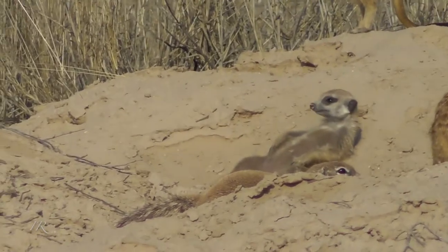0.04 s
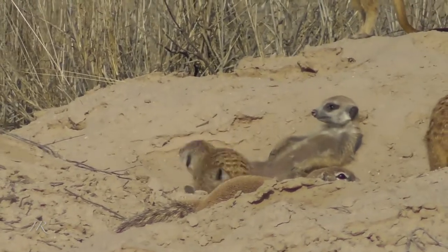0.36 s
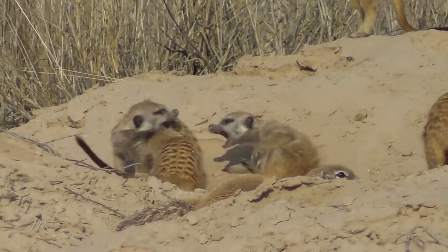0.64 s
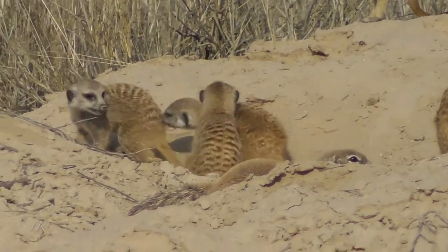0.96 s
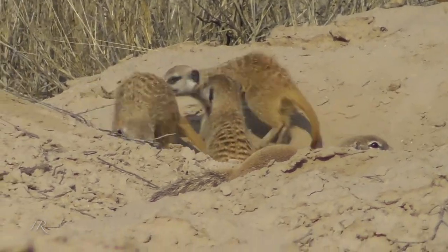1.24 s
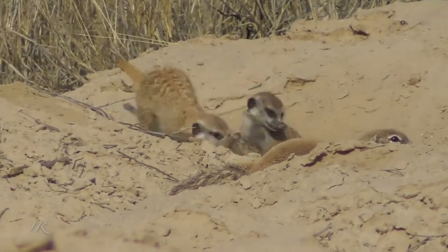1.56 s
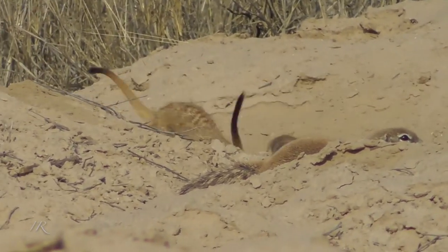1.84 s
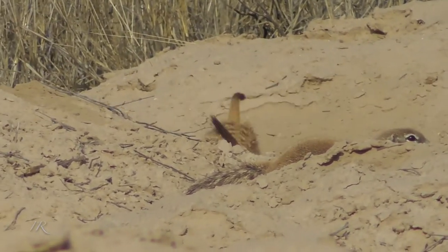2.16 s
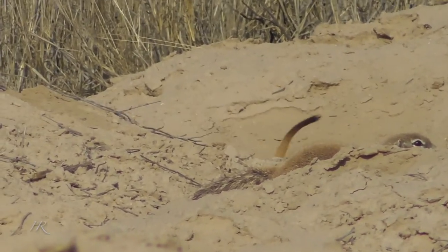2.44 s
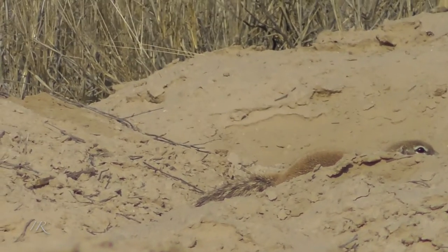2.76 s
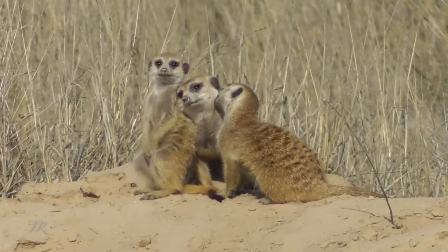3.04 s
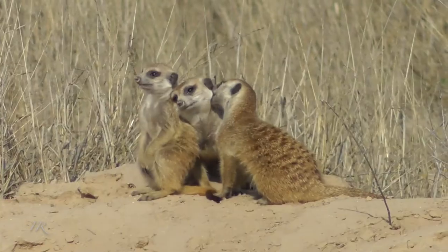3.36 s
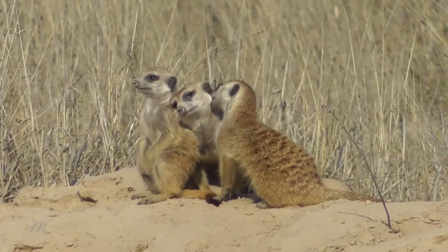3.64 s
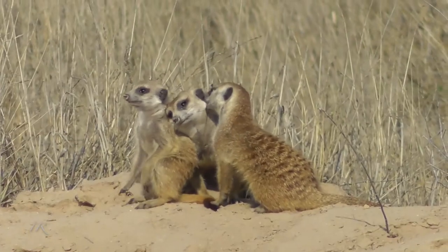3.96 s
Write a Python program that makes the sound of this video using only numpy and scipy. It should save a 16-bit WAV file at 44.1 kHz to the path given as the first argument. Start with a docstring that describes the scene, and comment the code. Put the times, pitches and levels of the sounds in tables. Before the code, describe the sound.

A quick run of thin, bird-like chirps and soft pips sounds slightly left of the microphone in dry, open country. After a short gap the chirping returns, joined late by raspier notes, over soft wind rumble and hiss.

```python
"""Dry open grassland by a meerkat burrow, with quick high chirps that suggest a small bird.
Each note is a fast whistled sweep. A few keep coming back: a sharp chip, a rising slur, two soft pips
and, late on, a two-voiced zigzag. Sand and grass scatter them briefly,
over low wind, steady hiss and a few soft knocks."""
import sys
import numpy as np
from scipy import signal
from scipy.fft import rfft, irfft
from scipy.io import wavfile

SR = 44100
rng = np.random.default_rng(int(sys.argv[2]) if len(sys.argv) > 2 else 0)


def inscribe(sig):
    """Save sig as 16-bit PCM at rate SR to the path in sys.argv[1].

    A 1-D sig is mono; a 2-D sig holds one channel per row.
    Samples are clipped to [-1, 1] before scaling.
    """
    pcm = np.round(np.clip(np.atleast_2d(sig).T, -1, 1) * 32767)
    wavfile.write(sys.argv[1], SR, pcm.astype(np.int16))


N = 176400
PURE, RASPY, BREATHY = .0049, .034, .067  # random waver, as a share of the pitch


def gain(db):
    """Turn decibels into a multiplier."""
    return 10 ** (np.asarray(db) / 20)


def wander(rate_hz, size):
    """A smooth random drift, about 1 either way."""
    steps = np.arange(size) * rate_hz / SR
    count = int(steps[-1]) + 2
    return 1.15 * np.interp(steps, np.arange(count), rng.standard_normal(count))


def tone_curve(points):
    """Join (pitch_hz, level_db) points into a gain for every frequency."""
    hz, db = np.array(points).T
    all_hz = np.arange(N // 2 + 1) * SR / N
    return gain(np.interp(np.log(all_hz + 1), np.log(hz), db))


def air_noise(tone):
    """Stereo noise, wide in the bass and top treble, narrow in between."""
    # stereo width, side against middle: pitch_hz, level_db
    widths = [(30, 7.5), (100, 10), (330, 10), (700, 6), (1290, 1), (1900, -7), (2700, -33), (6500, -36),
              (7800, -27), (8700, -9), (11000, -4.5), (15000, -1)]
    width = tone_curve(widths)
    mid, side = rfft(rng.standard_normal((2, N)))
    spectra = np.array([mid + width * side, mid - width * side])
    pair = irfft(spectra * tone_curve(tone) / np.hypot(1, width), N)
    return pair / pair.std()


def wind_and_hiss():
    """Low wind, high hiss and a rustle; the whole background noise dips and comes back."""
    # tone of each noise: pitch_hz, level_db
    wind_tone = [(20, 2), (50, 1.5), (110, 2), (200, 2.5), (400, -1.5), (700, -5.5), (950, -8.5),
                 (1200, -21.5), (1550, -36.5), (2000, -34.5), (3000, -56)]
    hiss_tone = [(1400, -44), (2000, -12.5), (2400, -26.5), (3000, -7.5), (4000, -19), (5100, -15),
                 (6500, -4.5), (8400, 1), (11000, 1), (15500, 1)]
    rustle_tone = [(1500, -27), (2450, -10), (2900, -3.5), (4200, 4.5), (5200, -5), (6200, 3.5), (8000, 0),
                   (10000, -1.5), (15000, -16)]
    # how the noises dip and come back: time_s, level_db
    background_levels = [(0, 0), (.6, 2), (1.3, 1.5), (1.5, -1.5), (1.95, -1), (2.1, 1.5), (2.8, 3),
                         (2.86, -1), (3.1, 0.5), (3.5, 2), (3.8, 4), (4, 2.5)]
    rustle_levels = [(0, -4), (.5, -6), (1.3, -6.5), (1.48, -15), (2.0, -11), (2.08, -6.5), (2.81, -1.5),
                     (2.85, -8), (3.1, -4.5), (3.5, -2), (4, 1.5)]
    t = np.arange(N) / SR
    background_db = np.interp(t, *np.array(background_levels).T)
    rustle_db = np.interp(t, *np.array(rustle_levels).T)
    wind = air_noise(wind_tone) * gain(-56.5 + 1.18 * wander(7.1, N))
    rustle = air_noise(rustle_tone) * gain(-67 + rustle_db + 2 * wander(30, N))
    hiss = air_noise(hiss_tone) * gain(-61.5)
    return (wind + hiss) * gain(background_db) + rustle


def note(shape, waver, flutter_db=.8, octave_db=-27):
    """One wavering, whistled sweep with a faint copy an octave up."""
    ms, hz, db = np.array(shape).T
    ms = np.sort(ms)
    t_ms = np.arange(ms[0], ms[-1], 1000 / SR)
    wobble, flutter = (wander(1300, len(t_ms)) for _ in range(2))
    off_tune = .011 * rng.standard_normal()
    pitch_hz = np.interp(t_ms, ms, hz) * (1 + off_tune + waver * wobble)
    phase = 2 * np.pi * np.cumsum(pitch_hz) / SR
    fade = np.clip(2 * np.minimum(t_ms - t_ms[0], t_ms[-1] - t_ms), 0, 1)
    loudness = fade * gain(np.interp(t_ms, ms, db) + flutter_db * flutter)
    return loudness * (np.sin(phase) + gain(octave_db) * np.sin(2 * phase))


def sing(calls, shapes, waver):
    """Play the shapes at every call; a shape's offset_ms counts from the call's time_s."""
    out = np.zeros(N)
    for time_s, level_db in calls:
        for shape in shapes:
            sound = gain(level_db - .2) * note(shape, waver)
            offset_ms = min(point[0] for point in shape)
            start = round((time_s + offset_ms / 1000) * SR)
            first, last = max(start, 0), min(start + len(sound), N)
            if last > first:
                out[first:last] += sound[first - start:last - start]
    return out


def whistles():
    """Faint, longer whistles that slide down."""
    # the slide: offset_ms, pitch_hz, level_db
    shape = [(-45, 4500, -12), (-20, 3700, -1), (0, 3250, 0), (25, 2900, -3), (45, 2700, -10)]
    # calls: time_s, level_db
    calls = [(.017, -60.5), (.457, -61.5)]
    return sing(calls, [shape], PURE)


def chips():
    """A sharp, pure chip between a raspy two-voiced flick and a low blip."""
    # the four sweeps: offset_ms, pitch_hz, level_db
    flick = [(-9.5, 8300, -27), (-8, 7500, -16), (-6.6, 5600, -15), (-5.6, 3900, -21), (-4.6, 2900, -32)]
    upper_flick = [(-12.5, 8350, -28), (-7, 6900, -10), (-3, 5480, -22), (-3.5, 4900, -30)]
    chip = [(-2.7, 5500, -26), (-1.7, 6150, -3.5), (-.2, 6870, 1), (1.3, 6900, -4), (2.4, 7000, -13),
            (3.4, 6900, -30)]
    blip = [(5.8, 3740, -34), (7.5, 4130, -10), (9.5, 4000, -17), (11.3, 3520, -25), (13, 1970, -22.5)]
    # calls: time_s, level_db
    calls = [(.068, -32), (.2221, -32), (.3693, -30.5), (.5233, -31), (.7558, -33.5), (.8999, -32.5),
             (1.0517, -32.5), (1.2663, -31.5), (2.0585, -33), (2.1937, -31), (2.3386, -32.5), (2.4872, -32),
             (2.9029, -32.5), (3.0619, -32.5), (3.2194, -31.5), (3.4497, -31.5), (3.6848, -32),
             (3.8469, -30.5), (3.9979, -30.5)]
    return sing(calls, [chip], PURE) + sing(calls, [flick, upper_flick, blip], RASPY)


def slurs():
    """A smooth upward slide just after a chip."""
    # the slide: offset_ms, pitch_hz, level_db
    shape = [(-9.7, 2650, -23), (-6, 3350, -10), (-1, 3980, -1.5), (3.5, 4330, .5), (7, 4600, -3),
             (9.5, 4650, -6), (12, 4450, -20)]
    # calls: time_s, level_db
    calls = [(.0995, -41.5), (.2531, -41.5), (.4013, -42.5), (.5554, -40.5), (.7865, -42), (.9315, -40.5),
             (1.0838, -40), (1.2975, -41), (2.0885, -43), (2.2249, -40.5), (2.3702, -40.5), (2.5195, -39),
             (2.9342, -41.5), (3.0925, -41), (3.2506, -41.5), (3.4808, -42), (3.7165, -42), (3.8785, -42.5)]
    return sing(calls, [shape], PURE)


def ticks():
    """Raspy drops in pitch, so quick that they tick."""
    # the drop: offset_ms, pitch_hz, level_db
    shape = [(-2.5, 5900, -16), (-1, 4900, -3), (0, 4200, -2), (1.3, 3500, -5), (3, 2900, -16)]
    # calls: time_s, level_db
    calls = [(.6035, -53), (.952, -46), (1.1135, -47), (1.9255, -49.5), (2.0955, -54), (2.236, -51),
             (2.644, -57), (2.808, -51.5), (3.013, -58), (3.394, -48.5), (3.542, -48)]
    return sing(calls, [shape], RASPY)


def pips():
    """Soft low and high pips; two breathy voices lead into each high one."""
    # the pips and each lead-in voice: offset_ms, pitch_hz, level_db
    low = [(-9.2, 2700, -20), (-7.5, 3700, -5), (-5.5, 4300, -20), (-3.5, 4250, -10), (-1, 4020, 1),
           (2.5, 3950, -2), (5.5, 4100, -17)]
    high = [(-8, 4960, -33), (-6, 5300, -3), (-6, 3600, -10), (-2.5, 5000, -8), (0.2, 4950, 0.5),
            (3.5, 4880, -6.5), (6, 4600, -8.5)]
    lead_in = [
        [(-36.5, 5700, -39), (-17.5, 5950, -21), (-9.5, 5700, -19), (-9, 5300, -22)],
        [(-36.5, 5000, -26), (-20, 3900, -20.5), (-13, 4300, -13), (-6, 8100, -27)],
    ]
    # calls: time_s, level_db
    low_calls = [(.6213, -45), (.777, -42), (.9713, -42.5), (1.1324, -42), (1.2885, -43.5), (2.1145, -48),
                 (2.2537, -43.5), (2.517, -38.5), (2.6629, -42.5), (3.2739, -45), (3.4109, -44.5),
                 (3.5602, -40), (3.7175, -39), (3.868, -43.5)]
    high_calls = [(.6722, -40), (.8307, -43), (1.0272, -41), (1.1894, -40), (1.3455, -43), (2.1649, -43.5),
                  (2.3074, -43.5), (2.5688, -42.5), (2.7193, -43.5), (3.3242, -45), (3.4672, -45),
                  (3.6159, -43), (3.7725, -43), (3.9243, -49)]
    pure_notes = sing(low_calls, [low], PURE) + sing(high_calls, [high], PURE)
    return pure_notes + sing(high_calls, lead_in, BREATHY)


def wisps():
    """Faint, raspy notes that fall away."""
    # the fall: offset_ms, pitch_hz, level_db
    shape = [(-14, 4300, -7), (-3.5, 3900, -6.5), (3.5, 3450, -5.5), (16, 3000, -21)]
    # calls: time_s, level_db
    calls = [(1.407, -66), (1.445, -70), (1.542, -69), (1.795, -68.5), (2.028, -66), (2.398, -63),
             (3.505, -56), (3.755, -56)]
    return sing(calls, [shape], RASPY)


def warbles():
    """A low voice wiggles while a high one dips and climbs."""
    # each voice: offset_ms, pitch_hz, level_db
    voices = [
        [(-24.5, 3100, -8), (-8.5, 2600, -13), (1.5, 3200, -2), (7, 2900, -6), (14.5, 2800, -6)],
        [(-23.5, 7000, -6), (-8.5, 4650, -4), (4, 4150, -5), (12, 4900, 2.5), (20.5, 4900, -4), (33, 6600, -7)],
    ]
    # calls: time_s, level_db
    calls = [(2.443, -68), (2.604, -63), (2.764, -62.5), (3.655, -65)]
    return sing(calls, voices, PURE)


def zigzags():
    """Two raspy voices sweep up, then both sweep down."""
    # each sweep: offset_ms, pitch_hz, level_db
    sweeps = [
        [(-14, 4700, -22), (-8.5, 5850, -4), (-5.8, 6600, -11), (-3, 8000, -3), (-1.3, 9300, -18)],
        [(-10, 2700, -25), (-4, 3500, -14), (-2.3, 4800, -12), (-.7, 5750, 0), (1, 7300, -1), (2.6, 8900, -12)],
        [(7.5, 8900, -15), (9.7, 8000, -3), (12, 5600, -1), (13.7, 3900, -13), (17.5, 2900, -21)],
        [(11.5, 9000, -16), (13.5, 7400, -6), (16, 6100, -10), (20, 5300, -18)],
    ]
    # calls: time_s, level_db
    calls = [(2.712, -67), (2.803, -57), (3.1925, -49), (3.311, -42.5), (3.449, -41.5), (3.5655, -40),
             (3.6965, -39), (3.815, -40), (3.974, -45.5)]
    return sing(calls, sweeps, RASPY)


def call_tone(calls):
    """The calls sound thin in the low tones and bright on top."""
    # their tone: pitch_hz, level_db
    tone = [(1900, -25), (2500, -2.5), (3000, 1.5), (4200, 1), (5000, 1.5), (6700, 1), (8200, 3),
            (9800, 10), (11000, 10), (14000, 0)]
    end_fade = np.minimum(np.arange(N)[::-1] / 64, 1)
    return irfft(rfft(calls * end_fade) * tone_curve(tone), N)


def ground(calls, onset_s=.0044, width=.084):
    """Add two echoes off the mound, quick scatter in the grass and a faint far tail."""
    # mound echoes: delay_ms, level_db
    echoes = [(7.8, -33), (10.2, -21)]
    t = np.arange(SR // 2) / SR
    response = np.zeros((2, len(t)))
    response[:, 0] = 1  # the direct sound
    for delay_ms, level_db in echoes:
        response[:, int(delay_ms * SR / 1000)] += gain(level_db)
    for level_db, fade_s in [(-10, .081), (-35.5, .45)]:  # grass, then far tail
        fade = 1000 ** (-t / fade_s) * np.minimum(t / onset_s, 1) ** 2
        mid, side = rng.standard_normal((2, len(t))) * fade
        scatter = np.array([mid + width * side, mid - width * side])
        response += gain(level_db) * scatter / np.linalg.norm(mid)
    return signal.fftconvolve(calls[None], response, axes=1)[:, :N]


def lean_left(pair):
    """The caller sits a little to the left; the treble shows it most."""
    # left minus right: pitch_hz, level_db
    balance = [(2500, .5), (4200, 0.6), (6800, 1.7), (9000, 4.5)]
    lean = np.sqrt(tone_curve(balance))
    return irfft(rfft(pair) * np.array([lean, 1 / lean]), N)


def knocks(fade_s=.00092):
    """Dull knocks that die within a couple of vibrations."""
    # knocks: time_s, pitch_hz, level_db
    hits = [(.214, 710, -45), (3.3814, 740, -42.5), (3.4135, 846, -40.5)]
    out = np.zeros(N)
    for time_s, pitch_hz, level_db in hits:
        t = np.arange(N) / SR - time_s
        out += gain(level_db) * np.exp(-(t / fade_s) ** 2) * np.cos(2 * np.pi * pitch_hz * t)
    return out


def scene():
    """Calls over open ground, with wind, hiss and knocks."""
    calls = whistles() + chips() + slurs() + ticks() + pips() + wisps() + warbles() + zigzags()
    return wind_and_hiss() + lean_left(ground(call_tone(calls))) + knocks()


def record(dry, top_hz=15950):
    """Cut away the highest treble."""
    return signal.sosfilt(signal.ellip(10, .1, 70, top_hz, fs=SR, output="sos"), dry)


dry = scene()
out = record(dry)
inscribe(out)
```